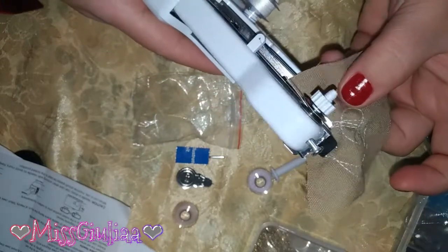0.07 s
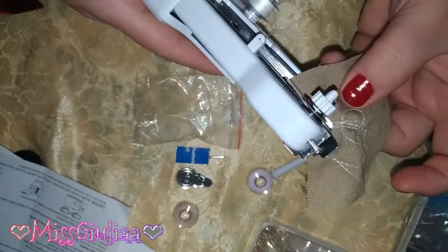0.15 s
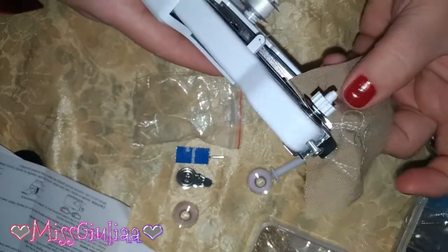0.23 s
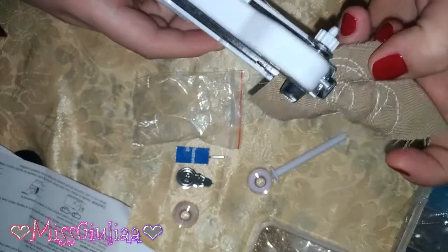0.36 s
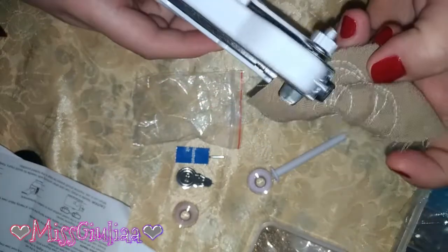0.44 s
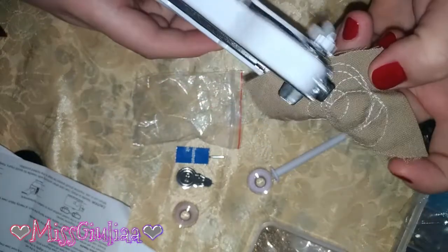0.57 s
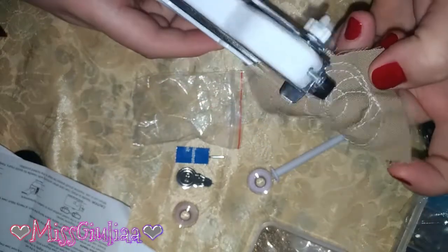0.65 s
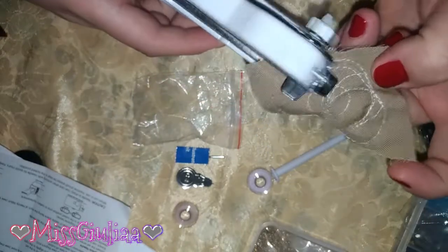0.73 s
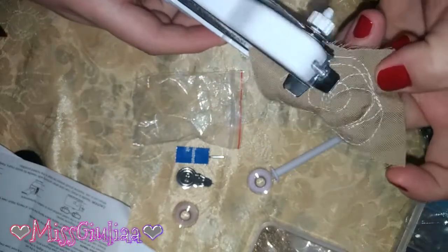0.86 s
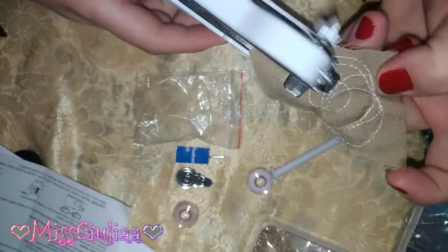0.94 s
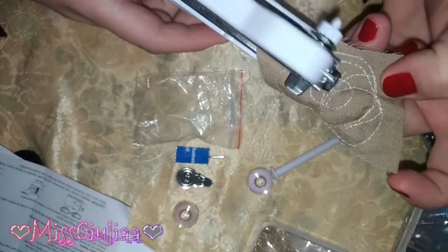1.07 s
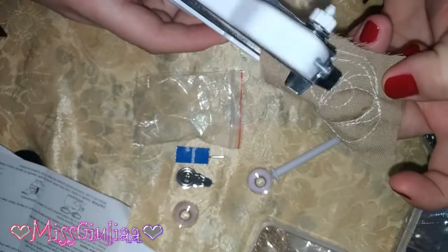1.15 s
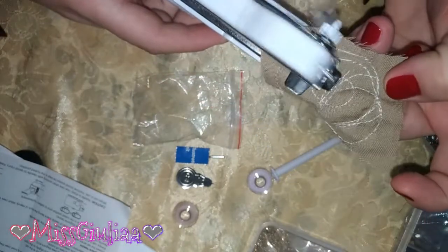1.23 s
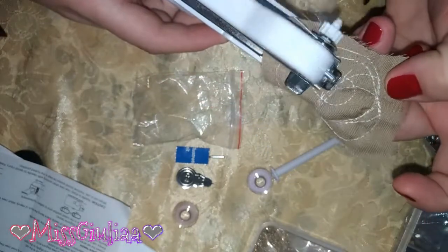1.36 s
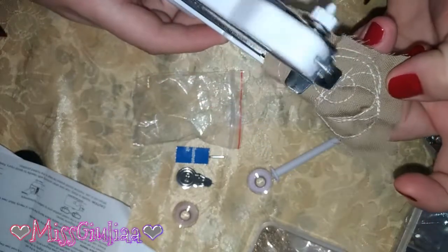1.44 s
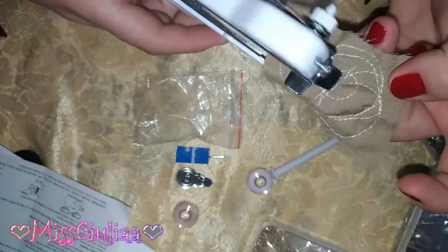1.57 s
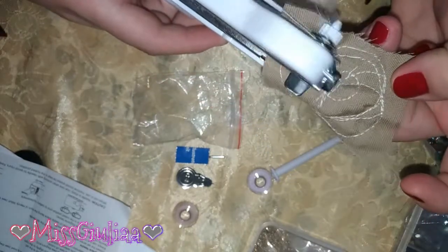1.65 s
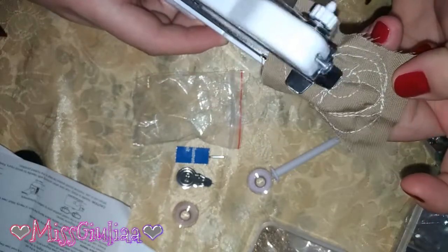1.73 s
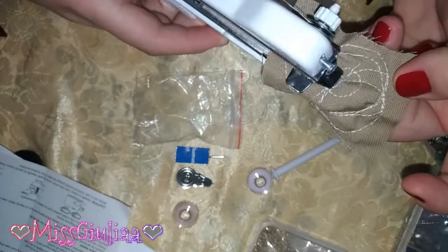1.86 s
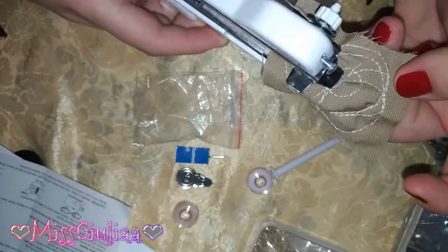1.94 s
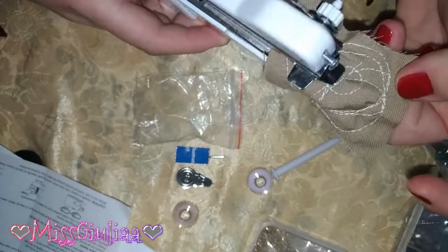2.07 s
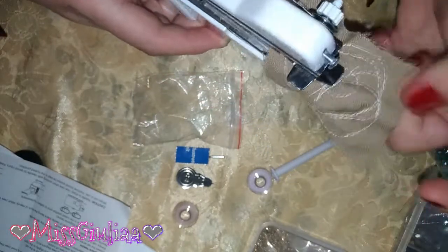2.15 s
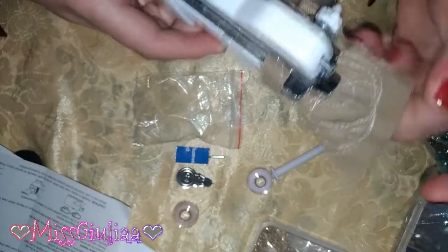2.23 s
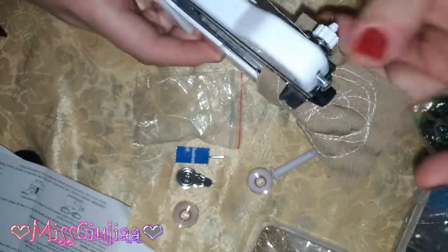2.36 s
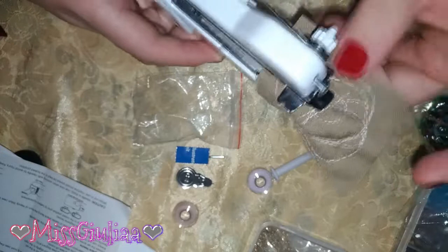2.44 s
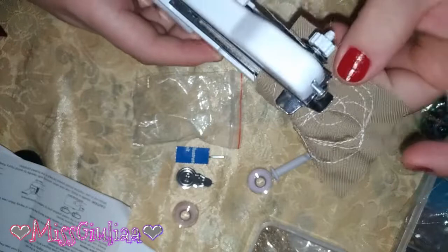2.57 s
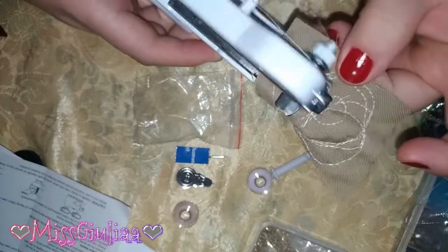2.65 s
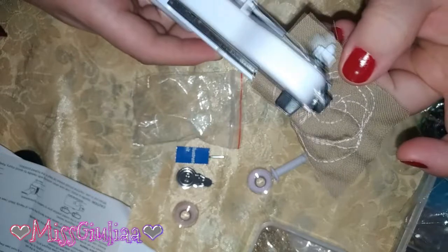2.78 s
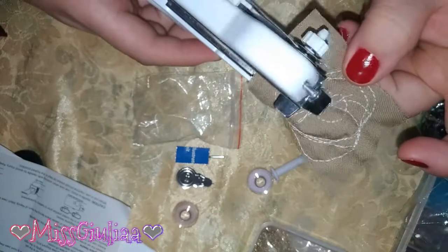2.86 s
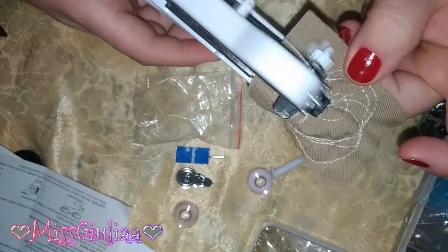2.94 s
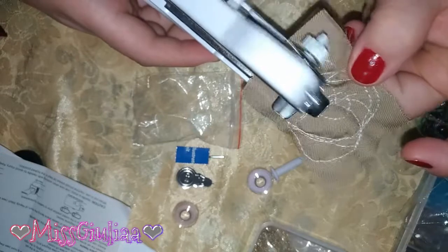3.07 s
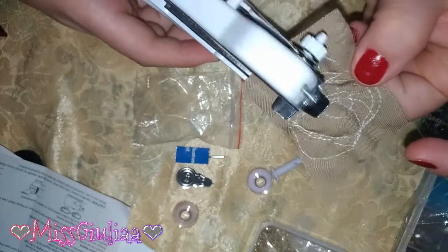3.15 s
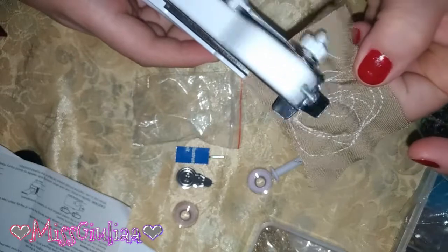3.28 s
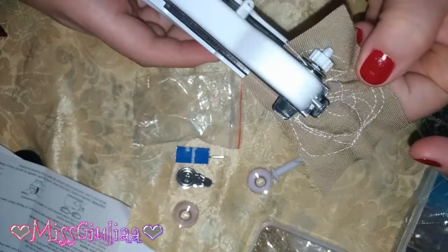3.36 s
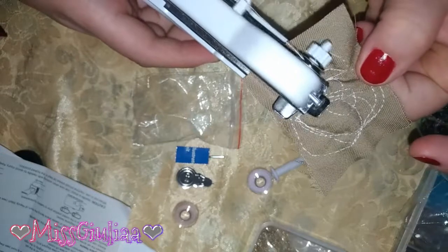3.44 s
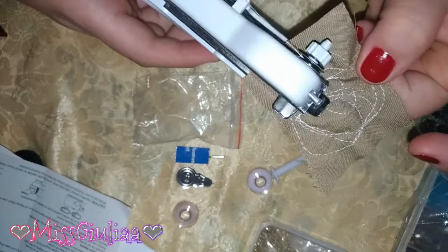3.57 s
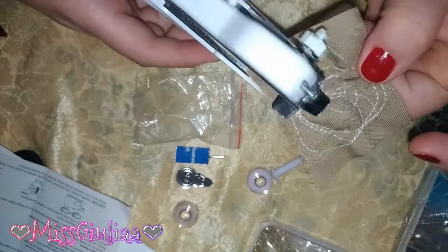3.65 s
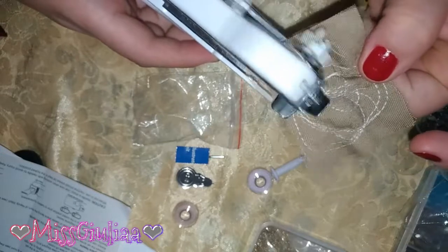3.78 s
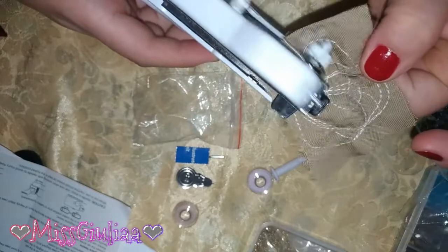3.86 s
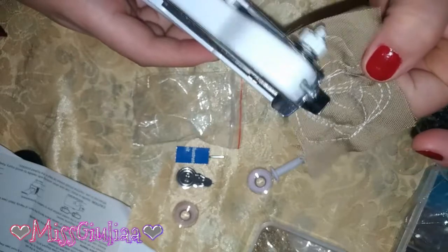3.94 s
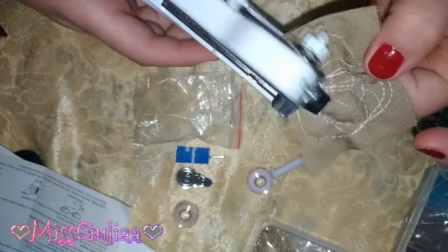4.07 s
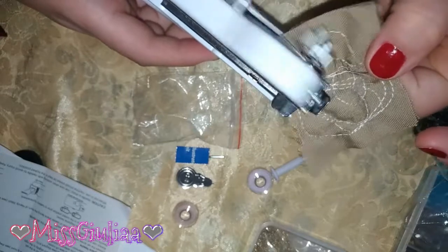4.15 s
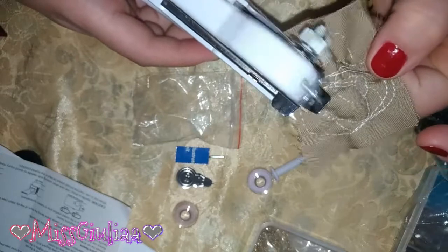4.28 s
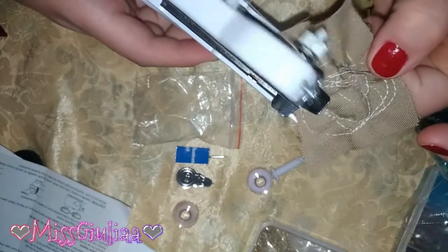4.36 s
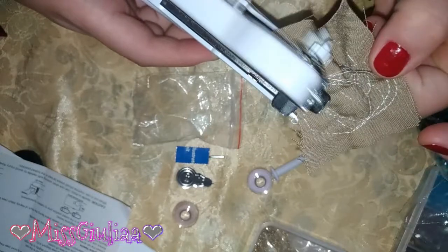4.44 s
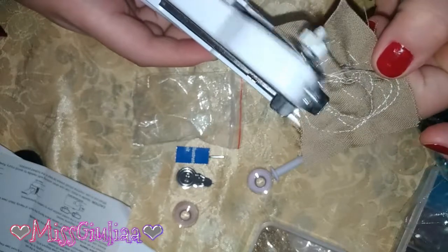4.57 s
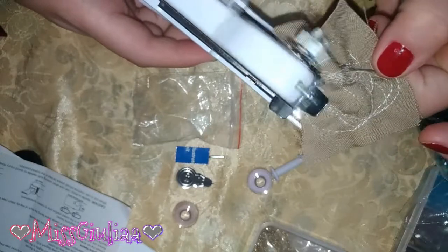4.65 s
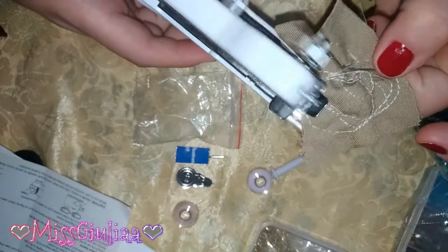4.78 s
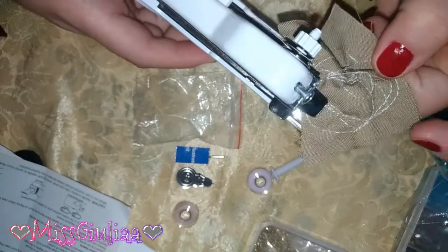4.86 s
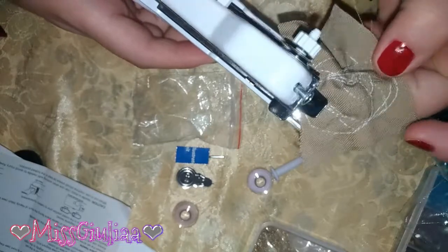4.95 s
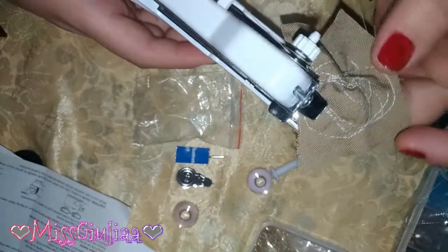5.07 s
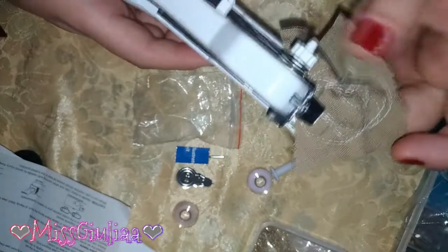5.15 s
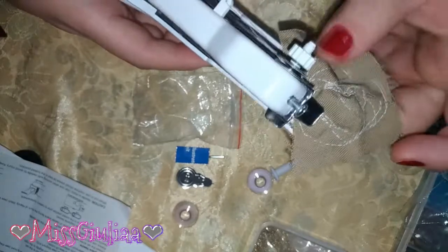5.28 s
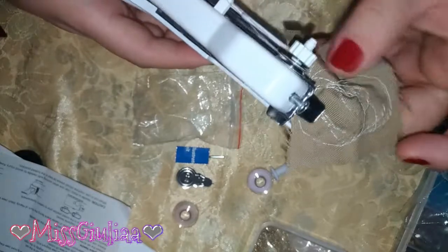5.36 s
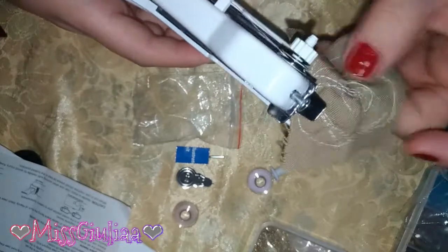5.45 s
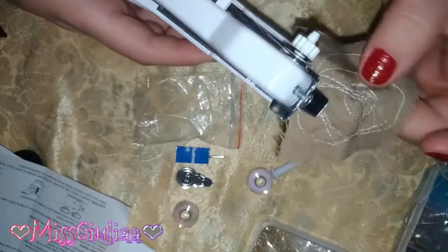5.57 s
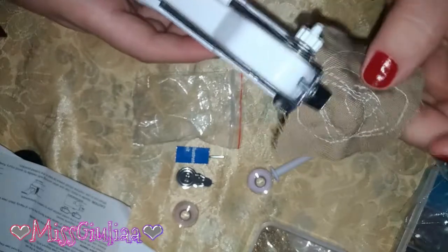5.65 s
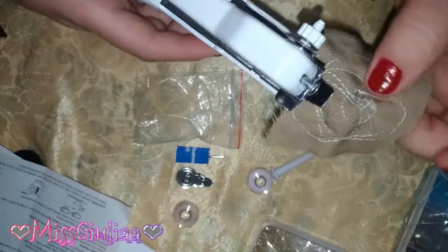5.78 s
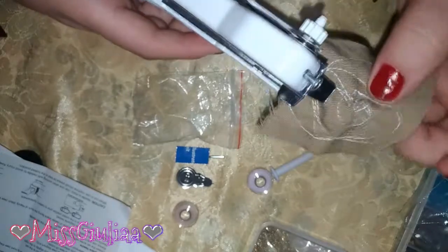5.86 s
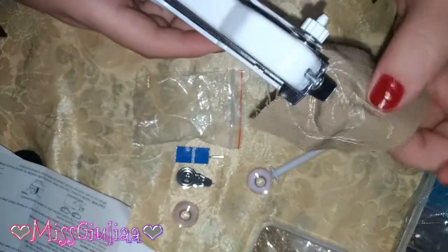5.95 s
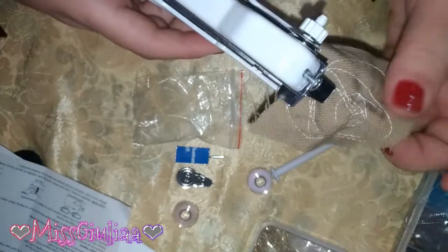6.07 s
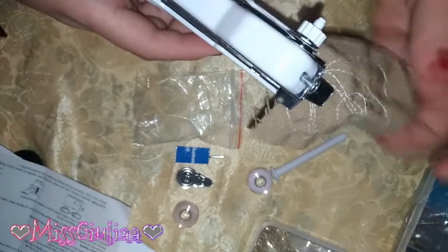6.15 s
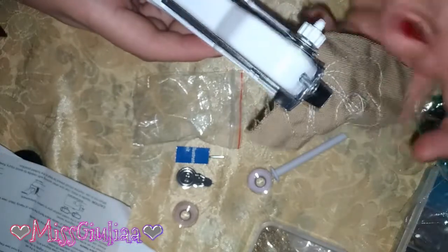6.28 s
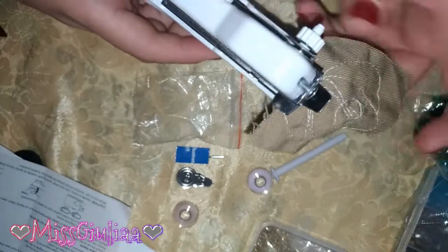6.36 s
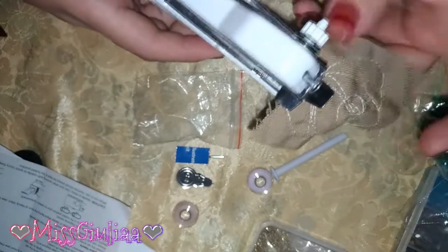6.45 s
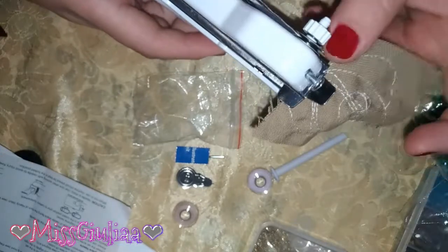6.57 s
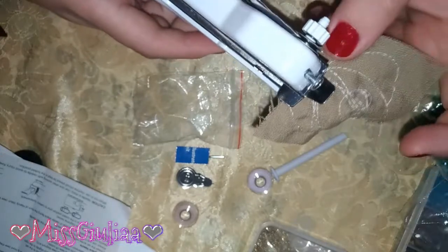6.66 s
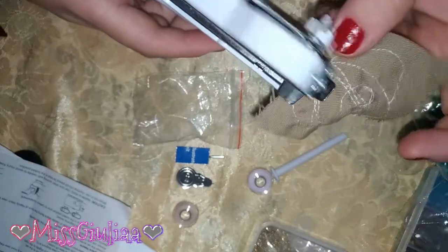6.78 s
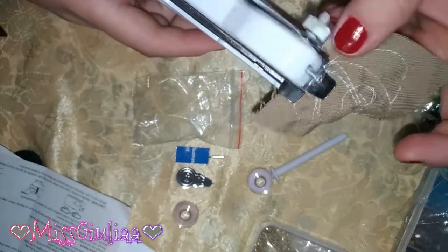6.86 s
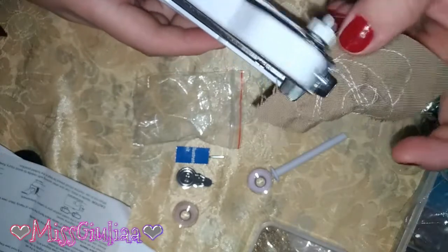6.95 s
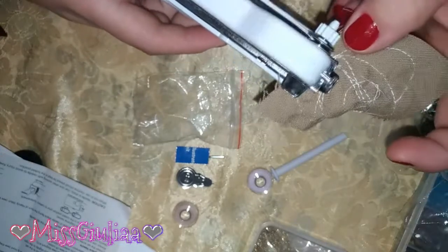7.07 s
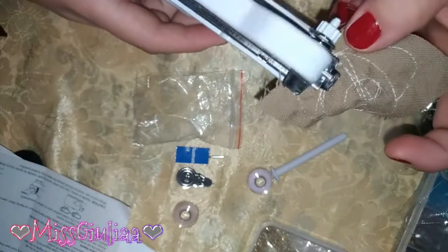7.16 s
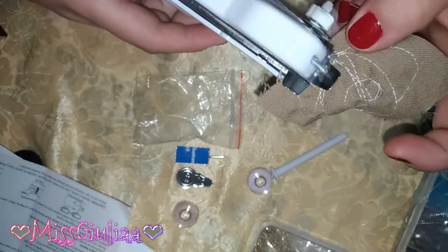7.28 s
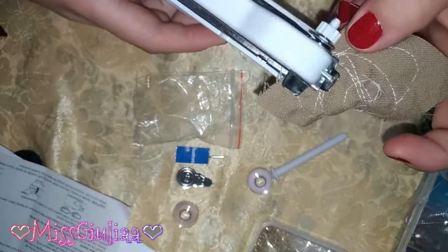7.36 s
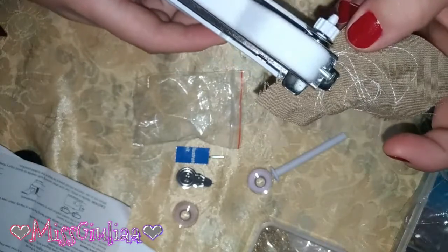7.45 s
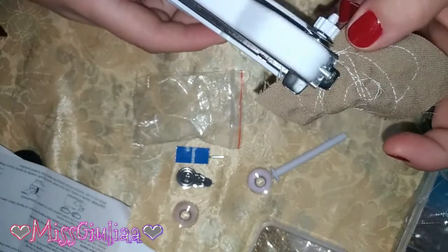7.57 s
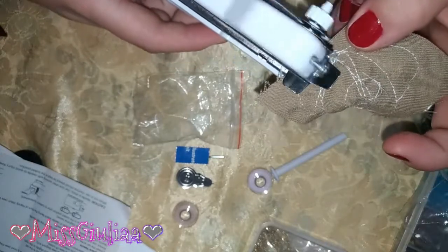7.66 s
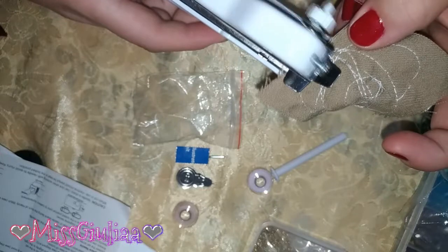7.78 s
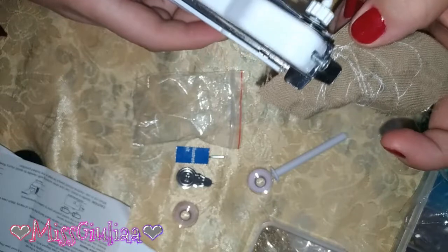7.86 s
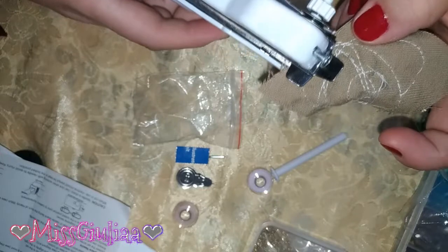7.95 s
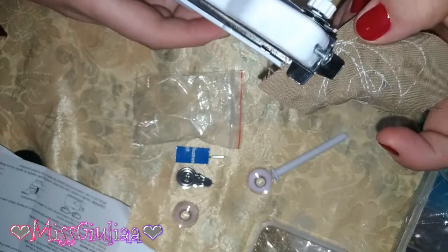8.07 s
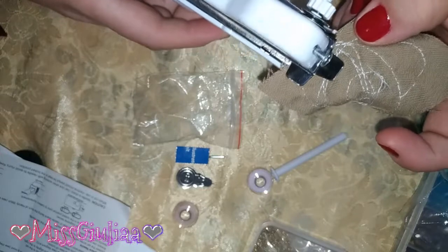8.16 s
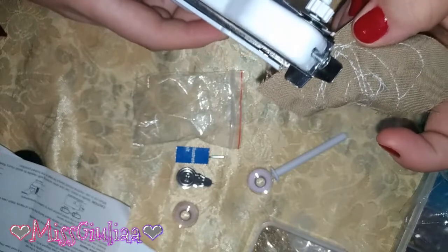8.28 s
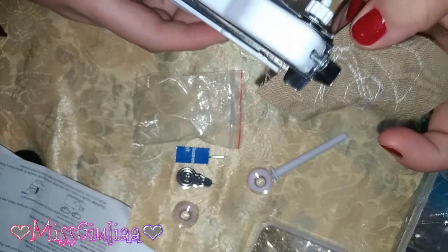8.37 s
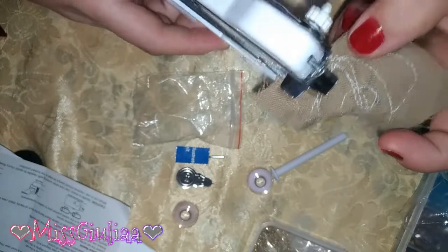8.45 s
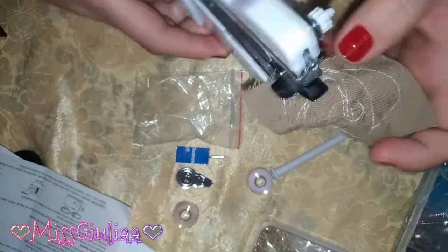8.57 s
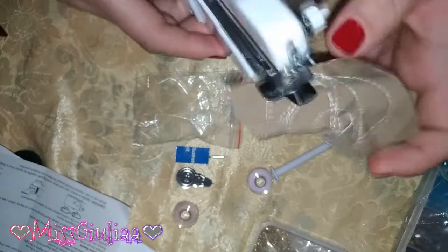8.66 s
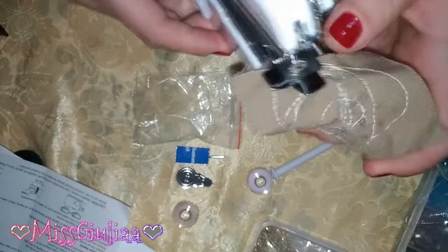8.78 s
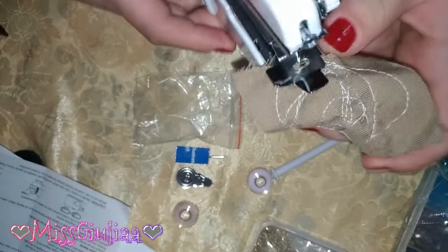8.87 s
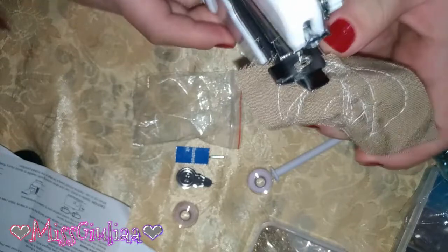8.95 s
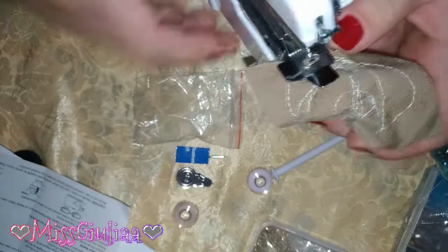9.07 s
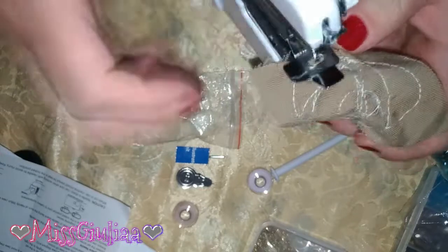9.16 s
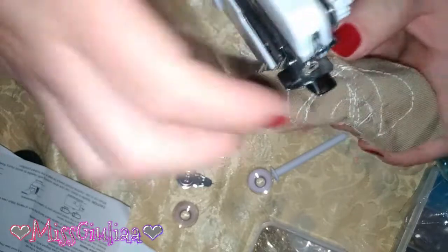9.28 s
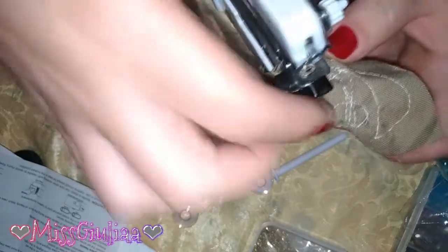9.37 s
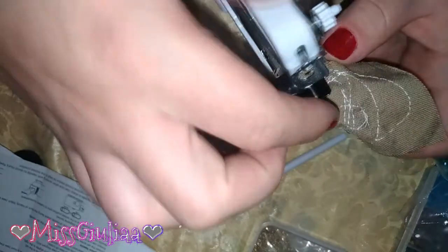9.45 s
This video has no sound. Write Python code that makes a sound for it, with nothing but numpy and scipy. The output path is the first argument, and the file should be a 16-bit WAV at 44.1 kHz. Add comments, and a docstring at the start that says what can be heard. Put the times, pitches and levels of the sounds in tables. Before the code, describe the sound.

A little handheld sewing machine runs close to the microphone in a small room. Grainy gear rattle, a high whine and a nasal groan pulse with sharp clacks about seven per second. Two long runs and several short ones stop abruptly; after a quiet gap come three brief bursts, then a low table bump, light ticks and faint cloth rustle over soft hum.

```python
"""Handheld sewing machine in a small room

A battery sewing machine stitches cloth in short bursts, just above a table. Noisy tooth contacts rattle
the plastic case, gear tones whine, a lever groans in every stitch and the needle arm clacks once a turn.
At the end a bump rings the table and fingers tick on the case; cloth slides as grainy noise.
Hum tones, faint room noise and a low drone made of a narrow noise band lie underneath."""
import sys
import numpy as np
from scipy import signal
from scipy.fft import rfft, irfft
from scipy.io import wavfile
from scipy.ndimage import uniform_filter1d

SR = 44100
rng = np.random.default_rng(int(sys.argv[2]) if len(sys.argv) > 2 else 0)


def persist_wave(psi):
    """Save psi, clipped to +-1, as 16-bit WAV."""
    counts = np.round(np.clip(psi, -1, 1) * 32767).astype(np.int16)
    wavfile.write(sys.argv[1], SR, np.atleast_2d(counts).T)


N = 419832
TIME = np.arange(N) / SR  # seconds

# All table levels are relative: the layers and the room add their own gain.
# presses of the switch: on_s, off_s, coast_to_rest_s, level_db, extra_force_at_start_db,
# extra_force_while_coasting_db, switch_click_db
PRESSES = [(-.3, .045, 0.092, 2, 0, 5, -60), (0.495, .688, .14, 0, 0.5, 1.5, -26.5),
           (.774, 1.762, 0.14, -1.5, 4, 3, -60.5), (2.644, 3.397, 0.14, -0.94, 4, 4.5, -24.5),
           (3.661, 4.85, .095, -1.1, 3.5, -2, -25), (6.779, 6.95, .155, -0.5, 4.5, 3, -20),
           (7.219, 7.36, 0.16, -0.5, 7, 1.5, -19.5), (7.643, 7.828, .095, -0.36, 2, -0.5, -23.5)]
# needle arm clacks, one per turn: start_s, level_db
NEEDLE_CLACKS = [(.059, -17.5), (.6452, -14), (.8348, -12), (.9819, -12), (1.125, -15.5), (1.2699, -15),
                 (1.415, -14), (1.5602, -14.5), (1.7056, -13.5), (2.6935, -10), (2.8444, -14),
                 (2.988, -14.5), (3.1306, -14), (3.2721, -13), (3.4196, -15), (3.7928, -14),
                 (3.9387, -12.5), (4.0835, -13.5), (4.2303, -14), (4.3761, -14), (4.521, -13),
                 (4.665, -14.5), (4.8071, -11), (6.8682, -10), (7.0615, -12), (7.393, -12.5),
                 (7.7808, -11.5)]
# small knocks of handling: start_s, level_db
HANDLING_TICKS = [(5.159, -40), (5.468, -40.5), (6.324, -45), (6.368, -46.5), (8.616, -21), (8.655, -23.5),
                  (8.855, -39), (8.931, -34.5), (9.04, -39), (9.06, -38), (9.093, -48), (9.441, -48)]
# cloth sliding under the fingers: middle_s, half_length_s, level_db
CLOTH_SWELLS = [(5.95, .45, -76.5), (8.96, 0.13, -63.5), (9.2, 0.74, -77.5)]
# swells of a faint low drone: middle_s, half_length_s, level_db
DRONE_SWELLS = [(2.61, .07, -58.5), (8.3, 0.99, -67.5)]
# spectrum of the gear rattle: freq_hz, density_db_per_hz
RATTLE_SPECTRUM = [(100, -31), (290, -26.5), (390, -13.5), (520, -10.5), (640, -1.5), (1000, -6),
                   (1400, 1.5), (2100, -2.5), (3000, -4.5), (4600, -5.5), (6000, -4), (7700, -13.5),
                   (9500, -25), (16000, -29)]
# spectrum of the needle arm's clack: freq_hz, density_db_per_hz
CLACK_SPECTRUM = [(100, -24.5), (400, -15.5), (800, -6), (1350, 4), (2000, -6.5), (3500, -1.5),
                  (6000, -6.5), (8200, -10.5), (10000, -13), (16000, -22)]
# spectrum of the handling ticks: freq_hz, density_db_per_hz
TICK_SPECTRUM = [(150, -14), (600, -10), (1000, -4), (1420, 3), (2100, -9), (2900, -8), (4200, -11),
                 (5400, -17), (7500, -17), (11000, -28), (16000, -41)]
# spectrum of the room noise: freq_hz, density_db_per_hz
ROOM_SPECTRUM = [(25, -13.5), (50, -1.5), (75, -8.5), (130, -15), (200, -14.5), (300, -15.5), (430, -23),
                 (700, -24), (1400, -29.5), (3600, -31), (8000, -35.5), (16000, -45)]
# resonances of the plastic case and its metal arm: centre_hz, width_hz, lift_db (negative is a dip)
CASE_RESONANCES = [(625, 50, 4), (710, 110, 6), (1310, 80, 2.5), (1540, 60, 2), (1880, 250, 3),
                   (2550, 110, 6), (3060, 90, 3), (3890, 200, 3), (4650, 300, -5), (5350, 350, 5),
                   (8140, 160, 5)]
# ringing modes of the table top: pitch_hz, level_db, t60_s
TABLE_MODES = [(53.6, -6, .9), (112, -3.5, 0.39), (132, 1, 0.33), (211.4, 1.5, 0.14), (294, -8.5, 0.204),
               (350, -14, 0.19)]
# mains hum and a distant appliance: pitch_hz, level_db_rms
HUM_TONES = [(49.8, -65.5), (100, -69), (194, -76.5), (298, -78.5)]
# colour of the two microphone ports: freq_hz, left_minus_right_db
PORT_COLOUR = [(60, -1), (110, 4.5), (200, 1.5), (380, -1), (700, 2), (1290, -1.5), (2380, -4), (4400, 1.5),
               (8120, 4.5), (15000, -5.5)]

FULL_HZ = 1996.4  # tooth rate of the first gear at full speed, before load sag and flutter
SPIN_UP_S = .034  # time constant of the motor
SURGE_S = .06  # time constant of the starting jolt
COAST_CURVE = 1.12  # 1 = dry friction alone; more = some drag as well
TEETH_PER_STITCH = 275  # spaces the turns before the first clack and after the last
HITS_PER_TOOTH = 4
# the crank's load in each stitch: centre and half width (shares of the turn after the clack),
# and the share of speed it costs
LOAD_AT, LOAD_WIDTH, LOAD_SAG = .54, .21, .1
# the gears go slack and quiet around each clack: centre and half width (shares of the turn), rattle change (dB)
SLACK_AT, SLACK_WIDTH, SLACK_DB = 0.93, 0.15, -4
# whine and lever groan: level without load, and rise under full load (dB)
WHINE_FREE_DB, WHINE_LOAD_DB, GROAN_FREE_DB, GROAN_LOAD_DB = -4, 11, -7, 10
MESH_DB, GROAN_DB = -20, -25  # relative levels of the gear mesh tone and the groan
# the feed lever's pitch: at rest and its rise (Hz); centre and half width of the rise (shares of the turn)
LEVER_HZ, LEVER_RISE_HZ, LEVER_AT, LEVER_WIDTH = 715, 95, .4, .16
BUMP_S, BUMP_DB = 8.616, -31.5
CLOTH_REST_DB, DRONE_REST_DB, ROOM_NOISE_DB = -78.5, -75.5, -62.5
PORT_LAG = 6  # samples by which the left port hears the machine later
TOP_HZ = 15900


def motor():
    """Speed (0-1) and effort (dB): each press spins the motor up with a jolt, then friction brings it to rest."""
    speed, effort_db = np.zeros(N), np.zeros(N)
    for on, off, coast_s, db, surge_db, coast_db, _ in PRESSES:
        started = TIME >= on
        since = np.maximum(TIME - on, 0)
        speed_at_press = np.interp(on, TIME, speed)
        powered = 1 - (1 - speed_at_press) * np.exp(-since / SPIN_UP_S)
        coasted = np.clip((TIME - off) / coast_s, 0, 1)
        speed = np.where(started, powered * (1 - coasted) ** COAST_CURVE, speed)
        press_db = db + surge_db * np.exp(-since / SURGE_S) + coast_db * np.sqrt(coasted)
        effort_db = np.where(started, press_db, effort_db)
    return np.maximum(speed, 1 / FULL_HZ), effort_db


def crank(hz):
    """Share of the turn since the last clack, counted in gear teeth."""
    teeth = np.cumsum(hz) / SR
    marks = np.interp(np.array(NEEDLE_CLACKS)[:, 0], TIME, teeth)
    marks = np.r_[marks[0] - TEETH_PER_STITCH, marks, marks[-1] + TEETH_PER_STITCH]
    return np.interp(teeth, marks, np.arange(len(marks))) % 1


def stroke(turn, centre, width, order=2):
    """A hump (0-1) once in every turn; a higher order gives it a flatter top."""
    distance = (turn - centre + .5) % 1 - .5
    return np.exp(-np.abs(distance / width) ** order)


def drive(speed_slope_db=16, pull_db=2):
    """Tooth rate and loudness of the gears; the load rises and falls with each turn of the crank."""
    speed, effort_db = motor()
    hz = FULL_HZ * speed
    turn = crank(hz)
    load = stroke(turn, LOAD_AT, LOAD_WIDTH)
    slack = stroke(turn, SLACK_AT, SLACK_WIDTH, order=6)
    # gears that are being pulled up to speed rattle more than coasting ones
    pull = np.tanh(uniform_filter1d(np.gradient(speed) * SR, size=400) / 5)
    rattle_db = effort_db + SLACK_DB * slack + pull_db * pull + speed_slope_db * np.log10(speed)
    # the crank load only shows in the whine near full speed
    whine_db = effort_db + (WHINE_FREE_DB + WHINE_LOAD_DB * load) * speed ** 2
    flutter = 1 + .009 * walk(90)
    groan_hz = LEVER_HZ + LEVER_RISE_HZ * stroke(turn, LEVER_AT, LEVER_WIDTH)
    groan_force = undb(effort_db + GROAN_FREE_DB + GROAN_LOAD_DB * load) * speed ** 2
    turning = hz > 1
    rattle_force = undb(rattle_db) * turning
    whine_force = undb(whine_db) * speed ** .45 * turning
    return hz * (1 - LOAD_SAG * load) * flutter, speed, rattle_force, whine_force, groan_hz, groan_force


def contacts(hz):
    """A few loose hits for each tooth, with rubbing in between."""
    hit_rate = HITS_PER_TOOTH * hz * (1 + walk(1500) / 4)
    hits = np.diff(np.floor(np.cumsum(hit_rate) / SR), prepend=0)
    rubbing = rng.standard_normal(N)
    return unit(unit(hits * rng.uniform(-1, 1, N)) + rubbing)


def rattle(hz, speed, force, soft_hz=1900, hardness=0.9, spread_db=-3, spread_hz=1200, db=-19.5):
    """Loose teeth shake the case, whose two sides radiate apart; slow teeth hit softly and sound dull."""
    mid, side = contacts(hz), contacts(hz)
    side = undb(spread_db) * high_pass(side, spread_hz)
    shake = undb(1.3 * walk(260))
    contact = np.array([mid + side, mid - side]) * force * shake
    dull = signal.sosfilt(signal.butter(1, soft_hz, fs=SR, output="sos"), contact)
    contact = dull + speed ** hardness * (contact - dull)
    return undb(db) * convolve(contact, colour(RATTLE_SPECTRUM, CASE_RESONANCES))


def whine(hz, force, shaft_db=-44, third_db=-37):
    """Gear tones: the mesh, its third harmonic, and a slower shaft tone."""
    phase = 2 * np.pi * np.cumsum(hz) / SR
    speed = hz / hz.max()
    tones = np.zeros(N)
    # pitch ratio to the mesh, level in dB, growth with speed (power)
    for ratio, db, power in [(1, MESH_DB, .6), (3, third_db, 2), (1 / 5, shaft_db, 3)]:
        gain = undb(db + 2 * walk(140)) * speed ** power
        tones += gain * np.sin(ratio * phase + walk(200) / np.pi)
    # the small case hardly radiates the lowest tones
    return high_pass(tones * force, 600, order=3)


def groan(hz, force, waver_db=2):
    """The feed lever rubs with a tone that rises and falls briefly in every stitch."""
    phase = 2 * np.pi * np.cumsum(hz * (1 + .015 * walk(40))) / SR
    return undb(GROAN_DB + waver_db * walk(80)) * force * np.sin(phase)


def needle(clack_db=25, snap_db=6, thump_db=-23, thump_hz=66, drop_hz=170, drop_s=0.0046, thump_t60=.075):
    """The arm clacks on the plate, the needle snaps through the cloth, and the hand takes a dull thump."""
    s, db = np.transpose(NEEDLE_CLACKS)
    clack = blows(s + 0.00056, db + clack_db, rise_s=.002, t60=0.012, grain_db=3.5)
    clack = convolve(clack, colour(CLACK_SPECTRUM, CASE_RESONANCES))
    snap = blows(s + .0005, db + snap_db, rise_s=.0025, t60=0.022, grain_db=3.0)
    snap_spectrum = [(3000, -28), (6500, -6.5), (8200, -1.5), (10000, -12), (13000, -13), (16000, -24.5)]
    snap = convolve(snap, colour(snap_spectrum))
    pushes = np.zeros(N)
    pushes[(s * SR).astype(int)] = undb(db + thump_db)
    t = TIME[:SR // 5]
    # the thump sinks in pitch as the cloth and the hand give way
    falling_hz = thump_hz + drop_hz * np.exp(-t / drop_s)
    thump = fade(t, thump_t60) * np.sin(2 * np.pi * np.cumsum(falling_hz) / SR)
    return clack + snap + convolve(pushes, thump)


def handling(tick_db=13.5, ring_s=0.016):
    """The switch and the case tick under the fingers; one bump rings the table in decaying sine modes."""
    switch = [(on, click_db) for on, *_, click_db in PRESSES if on > 0]
    s, db = np.transpose(switch + HANDLING_TICKS)
    ticks = blows(s, db + tick_db, rise_s=0.00084, t60=ring_s, grain_db=2.5)
    ticks = convolve(ticks, colour(TICK_SPECTRUM, CASE_RESONANCES))
    t = np.maximum(TIME - BUMP_S, 0)
    bump = np.zeros(N)
    for hz, mode_db, t60 in TABLE_MODES:
        bump += undb(mode_db + BUMP_DB) * fade(t, t60) * np.sin(2 * np.pi * hz * t)
    return ticks + bump


def cloth(grain_db=3, catch_db=3.0):
    """Threads catch and let go as the fabric is turned: noise of uneven grain and strength."""
    unevenness_db = grain_db * rng.standard_normal(N) + catch_db * walk(60)
    grains = unit(rng.standard_normal(N) * undb(unevenness_db))
    spectrum = [(200, -14.0), (700, -5), (1400, 1.5), (3000, -4), (7000, -12.0), (16000, -25.5)]
    return convolve(grains * swells(CLOTH_SWELLS, CLOTH_REST_DB), colour(spectrum))


def room(x, near_db=-5.5, near_t60=0.037, wall_db=-7, wall_t60=0.49, split_hz=650, air_hz=6000):
    """Direct sound reaches the right port first; table and hands scatter it, then the walls ring."""
    t = TIME[:SR * 2 // 3]
    near, walls = rng.standard_normal((2, 2, len(t)))
    # early scatter: flatten the spectrum, keep the random phase, cut the tail
    near = rfft(near * fade(t, near_t60))
    near = irfft(near / np.abs(near)) * (t < near_t60 * 2)
    near = high_pass(near, split_hz)
    walls = walls * fade(t, wall_t60) * np.minimum(t / 0.0045, 1)
    walls /= np.linalg.norm(walls, axis=1, keepdims=True)
    walls = signal.sosfilt(signal.butter(1, [300, air_hz], "band", fs=SR, output="sos"), walls)
    response = undb(near_db) * near + undb(wall_db) * walls
    response[0, PORT_LAG] += 1
    response[1, 0] += 1
    return undb(-2.5) * convolve(x, response)


def background(side_hz=500, bass_side=.3):
    """Faint room noise, more alike at both ports in the bass, and a wavering hum."""
    mid, side = convolve(rng.standard_normal((2, N)), colour(ROOM_SPECTRUM))
    side = bass_side * side + 0.53 * high_pass(side, side_hz)
    noise = undb(ROOM_NOISE_DB + .5 * walk(6.5)) * np.array([mid + side, mid - side])
    hum = np.zeros(N)
    for hz, db in HUM_TONES:
        gain = undb(db + 1.5 * walk(5.2)) * np.sqrt(2)  # rms to peak
        hum += gain * np.sin(2 * np.pi * hz * TIME + .5 * walk(3.0))
    return noise + hum


def drone():
    """A narrow band of low noise that swells and sinks."""
    spectrum = [(80, -31), (180, -9), (260, -7.0), (325, 2.5), (420, -18.5), (900, -47)]
    band = convolve(rng.standard_normal(N), colour(spectrum))
    return band * swells(DRONE_SWELLS, DRONE_REST_DB)


def swells(rows, rest_db):
    """A resting gain with smooth swells on top."""
    gain = undb(rest_db)
    for middle_s, half_length_s, db in rows:
        gain = gain + undb(db) * np.exp(-((TIME - middle_s) / half_length_s) ** 2)
    return gain


def blows(times, db, rise_s, t60, grain_db):
    """Each blow is a tight cluster of tiny contacts that swells and dies."""
    out, t = np.zeros(N + SR), TIME[:SR // 10]
    shape = np.minimum(t / rise_s, 1) ** 2 * fade(np.maximum(t - rise_s, 0), t60)
    for s, gain in zip(times, undb(db)):
        grains = rng.standard_normal(len(t)) * undb(grain_db * rng.standard_normal(len(t)))
        cluster = shape * grains
        start = max(int((s - rise_s / 2) * SR), 0)
        out[start:start + len(t)] += gain * cluster / np.linalg.norm(cluster)
    return out[:N]


def colour(points, resonances=(), size=8192):
    """Causal response of unit energy: a smooth spectrum lifted by resonances."""
    f = np.maximum(np.arange(size // 2 + 1) * SR / size, 1)
    hz, db = np.transpose(points)
    db = np.interp(np.log(f), np.log(hz), db)
    for centre, width, lift in resonances:
        db = db + lift / (1 + (2 * (f - centre) / width) ** 2)
    # folding the cepstrum forward gives minimum phase
    cepstrum = irfft(np.log(undb(db)))
    cepstrum[1:size // 2] *= 2
    cepstrum[size // 2 + 1:] = 0
    response = irfft(np.exp(rfft(cepstrum)))
    return response / np.linalg.norm(response)


def walk(rate):
    """Smooth chance with spread 1, changing about rate times a second."""
    k = max(int(SR / rate), 1)
    steps = np.repeat(rng.standard_normal(N // k + 1), k)
    return unit(uniform_filter1d(steps, k)[:N])


def convolve(x, response):
    """Pass a sound through one response or a stereo pair."""
    return signal.fftconvolve(np.atleast_2d(x), np.atleast_2d(response), axes=-1)[:, :N]


def high_pass(x, hz, order=1):
    """Cut what lies below a corner frequency."""
    return signal.sosfilt(signal.butter(order, hz, "high", fs=SR, output="sos"), x)


def fade(t, t60):
    """Decay by 60 dB in t60 seconds."""
    return np.exp(-np.log(1000) * t / t60)


def undb(db):
    """Decibels to gain."""
    return 10 ** (np.asarray(db) / 20)


def unit(x):
    """Scale to rms 1."""
    return x / np.sqrt(np.mean(x ** 2))


def scene():
    """The machine and the hands in the room, over the background and the drone."""
    hz, speed, rattle_force, whine_force, groan_hz, groan_force = drive()
    gears = rattle(hz, speed, rattle_force) + whine(hz, whine_force)
    machine = gears + groan(groan_hz, groan_force) + needle()
    return room(machine + handling() + cloth()) + background() + drone()


def record(dry):
    """Each port has its own colour; the deepest bass and the top are cut."""
    hz, db = np.transpose(PORT_COLOUR)
    f = np.maximum(np.arange(N // 2 + 1) * SR / N, 1)
    tilt_db = np.interp(np.log(f), np.log(np.maximum(hz, 1)), db) / 2
    ports = irfft(rfft(dry) * undb([tilt_db, -tilt_db]), N)
    ports = high_pass(ports, 42, order=6)
    return signal.sosfilt(signal.ellip(10, .2, 80, TOP_HZ, fs=SR, output="sos"), ports)


dry = scene()
out = record(dry)
persist_wave(out)
```